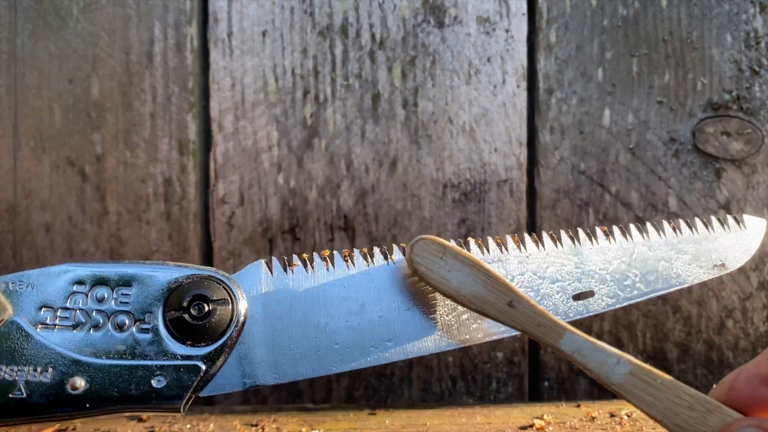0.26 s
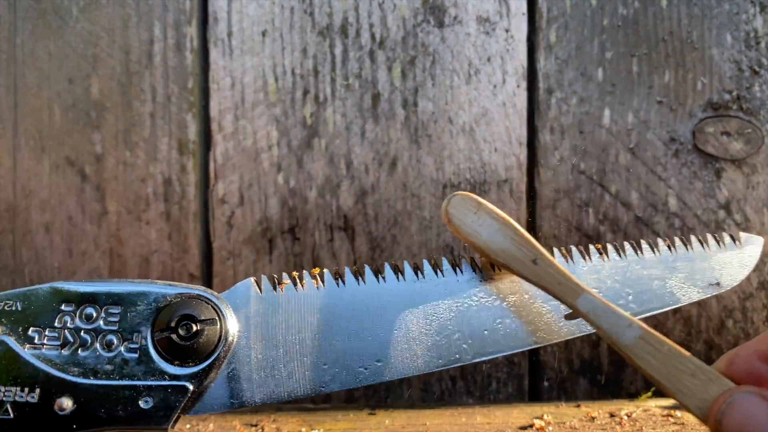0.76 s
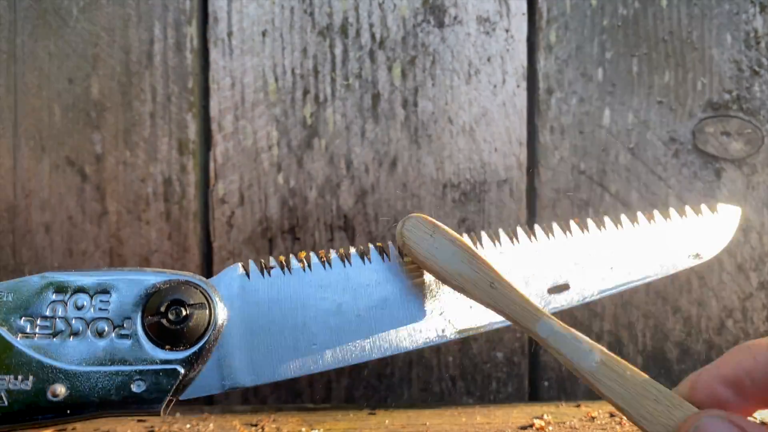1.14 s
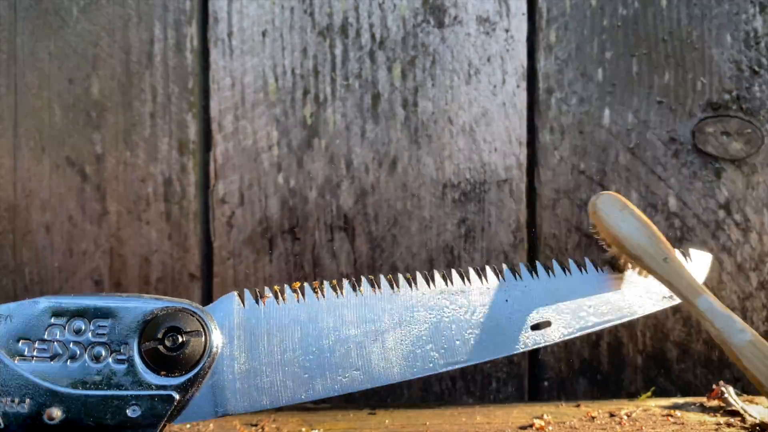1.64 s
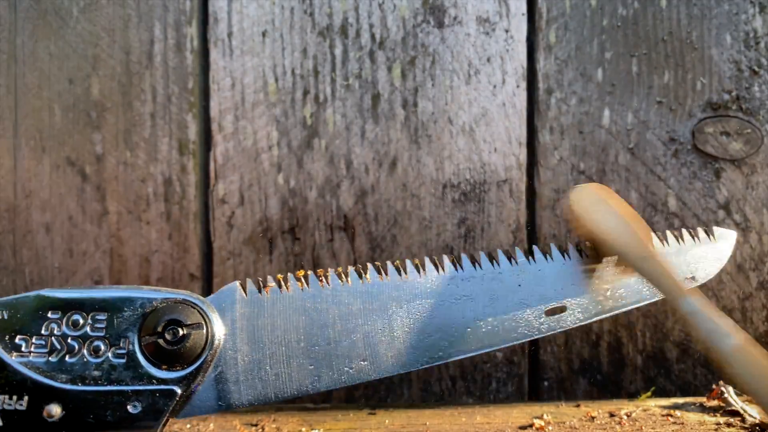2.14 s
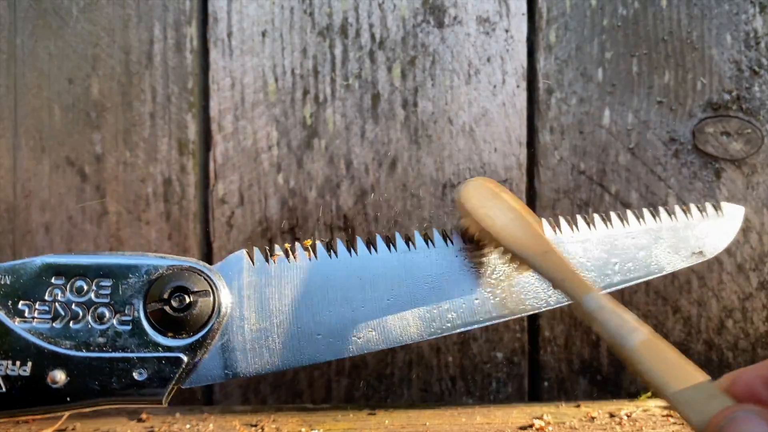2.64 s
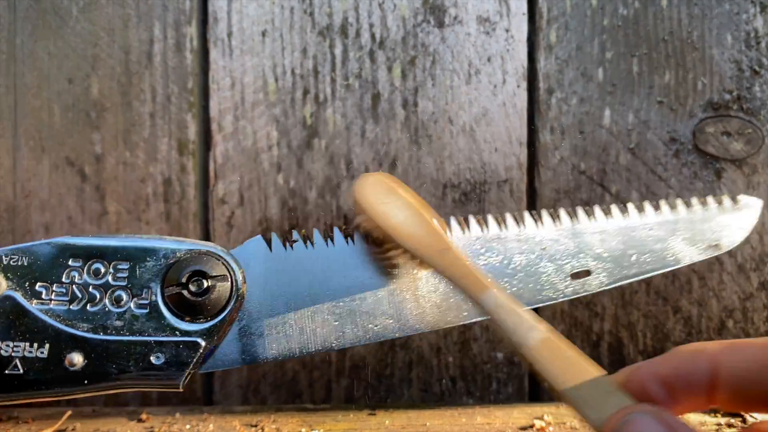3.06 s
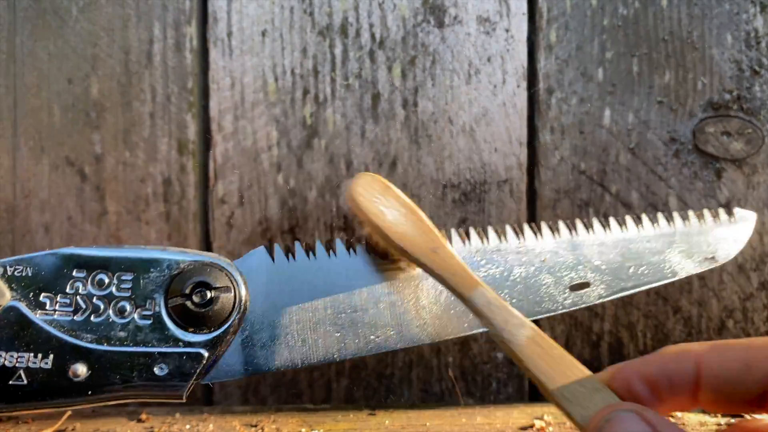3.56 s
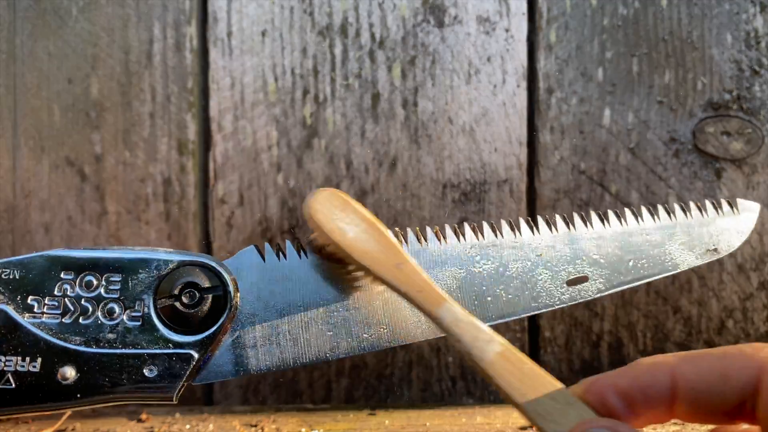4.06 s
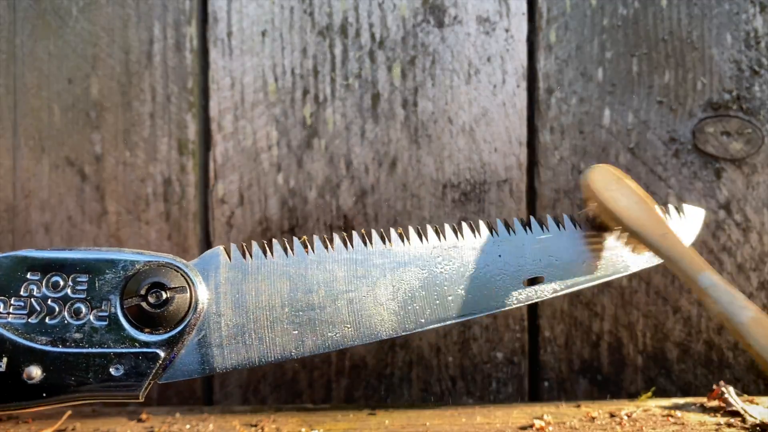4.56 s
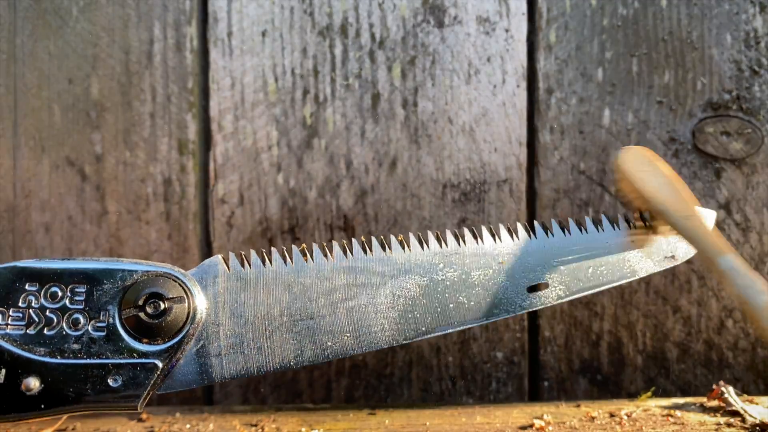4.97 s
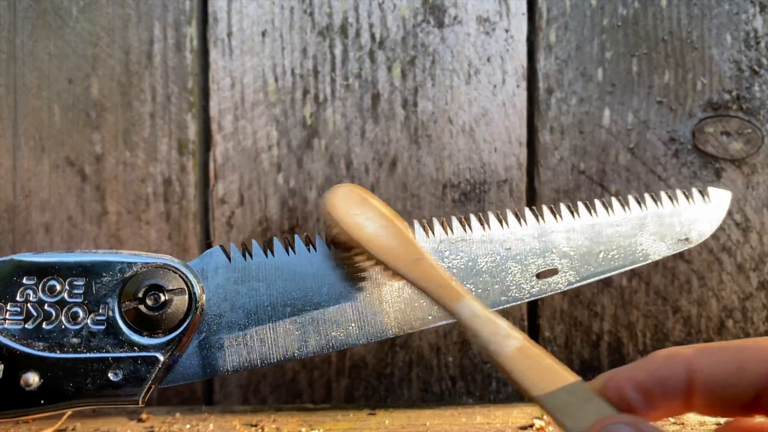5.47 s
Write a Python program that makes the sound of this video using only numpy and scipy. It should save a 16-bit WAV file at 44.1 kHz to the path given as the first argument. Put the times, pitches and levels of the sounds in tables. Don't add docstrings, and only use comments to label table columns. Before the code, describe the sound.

A bristle brush scrubs a saw's steel teeth in quick raspy strokes, the thin blade ringing brightly, over faint distant traffic.

```python
import sys
import numpy as np
from scipy import signal
from scipy.fft import rfft, irfft, next_fast_len
from scipy.io import wavfile
from scipy.ndimage import uniform_filter1d

SR = 44100
rng = np.random.default_rng(int(sys.argv[2]) if len(sys.argv) > 2 else 0)


def log_audio(samples):
    frames = np.atleast_2d(samples).T
    limited = np.clip(frames, -1, 1)
    pcm = np.round(limited * 32767).astype(np.int16)
    wavfile.write(sys.argv[1], SR, pcm)


def voltage_ratio(level):
    return 10 ** (np.asarray(level, float) / 20)


N = 252248

# (start [s], length [s], pressure at start [dB], pressure at end [dB])
STROKES = [(0.373, 0.018, -57, -56.5), (0.425, 0.12, -72, -51.5), (0.581, 0.011, -41.5, -78),
           (0.688, 0.039, -50, -41), (0.871, 0.11, -31, -52.0), (1.086, 0.041, -45.5, -49),
           (1.211, 0.072, -35.5, -45), (1.382, 0.021, -45.0, -48), (1.499, 0.1, -36.5, -41.5),
           (1.639, 0.023, -53, -69), (1.742, 0.049, -45, -40.5), (1.886, 0.11, -41.5, -44.5),
           (2.12, 0.26, -42.0, -46), (2.451, 0.021, -90, -57.5), (2.512, 0.17, -42.5, -42.0),
           (2.781, 0.15, -45, -45.5), (3.039, 0.075, -38.5, -41.5), (3.221, 0.15, -39, -50.5),
           (3.481, 0.126, -37, -44), (3.732, 0.091, -42, -42), (3.977, 0.29, -46, -46.0),
           (4.098, 0.45, -46, -48.5), (4.565, 0.073, -43, -44), (4.671, 0.025, -52, -67),
           (4.791, 0.026, -41, -56), (4.829, 0.02, -54.0, -46.5), (4.944, 0.11, -50.5, -41.5),
           (5.055, 0.31, -43.5, -55), (5.462, 0.25, -44, -39.5)]


def unit(x):
    return x / np.sqrt(np.mean(x ** 2) + 1e-20)


def curves(rows):
    s, *cols = np.transpose(rows)
    return [np.interp(np.arange(N) / SR, s, c) for c in cols]


def wobble(rate):
    knots = rng.standard_normal(4000)
    return 0.76 * np.interp(np.arange(N) * rate / SR, np.arange(len(knots)), knots)


def resonate(x, hz, width_hz):
    return signal.lfilter(*signal.iirpeak(min(hz, SR / 2.2), hz / width_hz, SR), x)


def noise(points):
    m = next_fast_len(N)
    hz, db = np.transpose(points)
    bins_hz = np.fft.rfftfreq(m, 1 / SR)
    gain = voltage_ratio(np.interp(np.log(bins_hz + 1), np.log(hz + 1), db, right=-120))
    return unit(irfft(rfft(rng.standard_normal(m)) * gain, m)[:N])


def swells(start, length, from_db, to_db, rise, fall, arch_db, trail_db, trail):
    t = np.arange(0, N / SR + .002, .001)
    u = np.clip((t - start) / np.maximum(length, 1e-3), 0, 1)
    arch = arch_db * np.sqrt(np.abs(length)) * (1 - (2 * u - 1) ** 2)
    db = from_db + (to_db - from_db) * u + arch
    after = np.maximum(t - start - length, 0)
    db = db - rise * np.maximum(start - t, 0)
    db = db + np.maximum(-fall * after, trail_db - trail * after)
    total_db = 10 * np.log10(np.sum(voltage_ratio(db) ** 2, axis=0) + 1e-16)
    return np.interp(np.arange(N) / SR, t, total_db)


def outdoors():
    # (time [s], level [dB])
    wash = [
        (0, -79.5),
        (.43, -73),
        (.62, -71),
        (2.3, -69),
        (4.2, -69),
        (5.56, -68),
        (5.72, -65),
    ]
    # (frequency [Hz], level [dB per Hz])
    air = [(30, -38), (60, -7.5), (100, -12), (250, -5.5), (400, -3.5), (1000, -2.5), (1600, -9),
           (2200, -20.5), (3000, -34), (15000, -46)]
    # (frequency [Hz], level [dB per Hz])
    engine_colour = [(35, -41), (55, -9), (85, -2), (118, 6), (150, -2.5), (220, -26)]
    # (time [s], peak level [dB])
    surges = [(.9, -81), (1.18, -74), (1.5, -72), (1.78, -67), (1.98, -75), (2.31, -63), (2.6, -75),
              (2.88, -75), (3.29, -73), (3.79, -73.5), (4.09, -68), (4.5, -78), (5.23, -76)]
    air_db, = curves(wash)
    s, db = np.transpose(surges)[..., None]
    surge_db = swells(s, 0 * s, db, db, rise=85, fall=61, arch_db=0, trail_db=-15, trail=30)
    idle_db = -83 + air_db - air_db.max()
    engine = (voltage_ratio(surge_db) + voltage_ratio(idle_db)) * voltage_ratio(1.6 * wobble(12)) * noise(engine_colour)
    return voltage_ratio(air_db + 1.5 + 2.0 * wobble(20)) * noise(air) + engine


def bird():
    # (time [s], pitch [Hz], level [dB], time to fade [s])
    chirps = [
        (.075, 4340, -96, 0.048),
        (.12, 4570, -86, 0.17),
        (0.165, 4620, -68, 0.065),
        (0.214, 4590, -67.5, 0.054),
        (0.249, 8080, -68, 0.032),
    ]
    out, t = np.zeros(N), np.arange(SR // 15) / SR
    for s, hz, db, t60 in chirps:
        phase = 2 * np.pi * hz * (t - 0.19 * t * t) + 1.0 * wobble(300)[:len(t)]
        onset = (1 - np.exp(-t / 0.0017)) ** 2
        out[round(s * SR):][:len(t)] += voltage_ratio(db + 11 - 40 * t / t60) * onset * np.sin(phase)
    return out


def knocks():
    # (time [s], flex peak level [dB], wood against flex [dB])
    bumps = [(0.8869, -50.5, -13), (1.2176, -41.5, -8.5), (1.2446, -46.5, -10.5), (1.517, -41, -13.5),
             (1.5479, -47.5, -8.5), (1.9809, -51.5, -24), (2.2209, -54, -4.5), (2.2694, -49, -8),
             (2.5975, -52, -13.5), (3.052, -56, -15), (4.1475, -47, -24), (4.2512, -53, -12),
             (5.1228, -51.5, -16), (5.5767, -47, -15), (5.685, -43.5, -13.5)]
    # (frequency [Hz], width [Hz], level [dB])
    head = [(352, 22, 2.5), (470, 690, -11.5), (1008, 12, 5), (1463, 42, 3)]
    flex, wood, t = np.zeros(N + SR), np.zeros(N + SR), np.arange(SR // 10) / SR
    for s, db, wood_db in bumps:
        push = voltage_ratio(db + 21.5 - 60 * t / 0.15) * rng.standard_normal(len(t))
        flex[round(s * SR):][:len(t)] += push
        wood[round(s * SR):][:len(t)] += voltage_ratio(wood_db - 4.0) * push
    out = resonate(flex[:N], 1985, 35) + voltage_ratio(-17) * resonate(flex[:N], 2064, 76)
    for hz, width_hz, db in head:
        out += voltage_ratio(db) * resonate(wood[:N], hz, width_hz)
    return out


def flicks(per_second, size_db, clump_db):
    chance, size = rng.random(N), np.minimum(rng.exponential(1, N), 3)
    clumps_db = clump_db * wobble(80) + 3.7 * wobble(330) + 0.47 * wobble(35)
    return unit((chance < per_second / SR) * voltage_ratio(size_db * size + clumps_db))


def tufts(rows):
    out, t = np.zeros(N + SR), np.arange(SR // 15) / SR
    for s, db, t60 in rows:
        t60 = np.clip(t60, .002, .08)
        onset = 1 - np.exp(-t / (0.14 * t60))
        out[round(s * SR):][:len(t)] += voltage_ratio(db - 6.5 - 60 * t / t60) * onset
    return out[:N]


def tuft_bursts():
    # (time [s], peak level [dB])
    catches = [(0.428, -34), (1.6397, -32), (0.4483, -16.5), (0.4748, -20), (0.5103, -31), (0.537, -25),
               (.675, -30.5), (.716, -40), (0.8498, -28), (0.866, -25), (0.925, -19.5), (1.1943, -44),
               (1.3785, -33), (1.489, -20.5), (1.8693, -40), (1.892, -32), (2.1057, -45), (2.1316, -26),
               (2.519, -43), (3.0401, -41), (3.2114, -57), (3.2284, -30), (3.729, -34), (4.407, -26),
               (4.44, -33), (4.4756, -30), (4.7687, -38), (4.783, -32), (4.958, -42), (5.481, -21.5)]
    # (time [s], peak level [dB], time to fade [s])
    strays = [(.3, -79, 0.0054), (.618, -46, .003), (.811, -45, .004), (1.044, -46, 0.0047),
              (1.505, -35, .0037), (1.6028, -45, .012), (1.725, -52, .004), (1.906, -14.5, 0.0034),
              (2.04, -54, .004), (4.71, -43, .004), (4.885, -56, .004), (1.96, -32, .0036),
              (2.453, -45, 0.0095), (2.7404, -38, 0.017), (3.175, -55, 0.016), (3.447, -44, 0.017),
              (3.6943, -32.5, .012), (4.348, -24, .0096), (4.665, -24.5, 0.0077), (4.686, -52, 0.014),
              (4.809, -38, .0034)]
    first = [(s - 0.0072, db - 0.5) for s, _, db, _ in STROKES]
    return tufts([(s, db, 0.01) for s, db in catches + first] + strays)


def plucks():
    # (time [s], peak level [dB])
    slips = [
        (.478, -29),
        (1.657, -15),
        (1.959, -12.5),
        (3.547, -16),
        (4.635, -33),
        (4.687, -19),
        (4.836, -15.5),
    ]
    return 11 * tufts([(s, db, .009) for s, db in slips])


def brush_pressure():
    # (start [s], length [s], pressure at start [dB], pressure at end [dB])
    lingers = [(0.318, 0.059, -94.5, -67), (0.421, 0.018, -56, -45), (.76, 0.061, -75, -78),
               (1.308, 0.039, -81, -84), (1.438, .05, -71, -74), (2.732, .05, -79, -76),
               (3.144, 0.078, -81, -74), (3.643, 0.05, -82, -73), (4.694, 0.028, -76, -73),
               (4.894, 0.044, -71, -63), (5.357, 0.028, -65, -71)]
    start, length, from_db, to_db = np.transpose(STROKES + lingers)[..., None]
    return swells(start, length, from_db, to_db, rise=1190, fall=1031,
                  arch_db=8.5, trail_db=-29, trail=405)


def ring_balance(pressure_db):
    # (time [s], seat [0 = on the tooth tips, 1 = on the flat])
    seat_path = [(.3, -0.77), (.52, 0.81), (.95, 0.69), (1.22, -0.11), (1.4, 1), (1.52, 0.31), (1.75, 0.76),
                 (1.98, 0.25), (2.15, 0.74), (2.31, -0.047), (4.27, 0.028), (4.4, 0.63), (4.54, 0.49),
                 (4.72, -0.11), (5.08, 0.64), (5.26, -0.2), (5.55, 0.13), (5.72, 0.63)]
    # (time [s], reach [0 = where the middle rings are at rest, 1 = where they swing most])
    reach_path = [(.4, 0.91), (.6, 0.2), (.75, 0.42), (1.0, 0.32), (1.22, 1), (1.42, 1), (1.65, 0.025),
                  (2.02, 0.18), (2.28, 0.6), (2.5, 0.57), (3.0, 0.35), (3.5, 0.28), (4.12, 0.19),
                  (4.33, 0.78), (4.58, 0.18), (5.17, 0.79), (5.42, 0), (5.72, 0.86)]
    (seat,), (reach,) = curves(seat_path), curves(reach_path)
    eased_db = np.clip(-42.5 - pressure_db, 0, 40)

    def family_db(tips_db, flat_db, belly_db, lag):
        return tips_db + flat_db * seat + belly_db * reach + lag * eased_db

    teeth = family_db(-2.28, -17, -0.6, 0.4)
    second = family_db(-13.5, -4.5, 9.5, .2)
    mid = family_db(-10.5, 3, 8.5, 0.1533)
    bending = 0.27 * teeth + 0.27 * second + 0.63 * mid - 13
    return bending, teeth, second, mid, 0


def saw():
    # (frequency [Hz], width [Hz], level [dB])
    blade = [(1440, 39, -22), (1990, 44, -15), (2810, 70, -22), (3170, 40, -18), (4160, 33, -3),
             (4370, 45, 0), (5330, 53, -4), (5840, 50, -15), (6310, 76, -9), (6810, 36, -9), (7200, 56, -3),
             (7840, 40, -11), (8190, 81, -12), (8510, 67, -15), (8950, 38, -12), (9190, 79, -12),
             (10200, 96, -8), (10600, 32, -14), (11400, 68, -4), (12300, 98, -5), (13400, 74, -8),
             (13900, 70, -9), (15100, 100, -5), (15400, 43, -9),
             (2230, 50, -22), (3800, 60, -18), (4580, 50, -13), (5250, 40, -10), (10080, 45, -8),
             (11300, 60, -6), (12500, 80, -5), (15010, 70, -8), (14150, 70, -9), (14600, 70, -14)]
    # (frequency [Hz], width [Hz], level [dB])
    bristle = [(2020, 920, -35.5), (3050, 280, -21.5), (4000, 275, -17), (4820, 570, -25), (5240, 300, -19),
               (7400, 1100, -33), (9100, 1400, -34), (10440, 700, -20), (13100, 830, -12.5),
               (15700, 3400, -16.5)]
    # (frequency [Hz], ..)
    plucked_hz = (4160, 4370)
    # (frequency [Hz], ..)
    family_hz = (3400, 4900, 5700, 9600)
    pressure_db = brush_pressure()
    balance_db = ring_balance(pressure_db)
    rasp = flicks(per_second=12000, size_db=2.0, clump_db=-0.5)
    burst, pluck = tuft_bursts(), plucks()
    resting = voltage_ratio(-87.5) * np.clip((np.arange(N) / SR - 0.28) / 0.068, 0, 1)
    modes = np.array(blade + bristle) * [1, .8, 1]
    family = np.searchsorted(family_hz, modes[:, 0])
    bursts_db = (-25.0, -6.5, -5, 1.5, 5.5)
    rests_db = (6.5, -1, -3.5, 1.5, -2.0)
    out = np.zeros(N)
    for k, (rel_db, burst_db, rest_db) in enumerate(zip(balance_db, bursts_db, rests_db)):
        rubbing = voltage_ratio(pressure_db + rel_db) + voltage_ratio(rest_db) * resting
        force = rubbing * rasp * voltage_ratio(1.3 * wobble(45)) + voltage_ratio(burst_db) * burst
        own = modes[family == k]
        coupling = np.array([voltage_ratio(db + 8.15 * wobble(8.8)) for db in own[:, 2]])
        force /= np.sqrt(own[:, 1] @ coupling ** 2 * np.pi / SR)
        for (hz, width_hz, db), gain in zip(own, coupling):
            spots = rng.standard_normal(N)
            drive = gain * force + (hz in plucked_hz) * voltage_ratio(db) * pluck
            out += resonate(drive * spots, hz, width_hz)
    return out


def damped(x, patchy_db):
    z = signal.stft(x, nperseg=512, noverlap=384)[2]
    field = uniform_filter1d(rng.standard_normal(z.shape), size=3, axis=0)
    field = uniform_filter1d(field, size=6, axis=1)
    return signal.istft(z * voltage_ratio(patchy_db * unit(field) - 1.5), nperseg=512, noverlap=384)[1][:N]


def scene():
    return (damped(saw(), patchy_db=3) + knocks() + bird() + outdoors())[None]


def roll_off(x):
    return signal.sosfilt(signal.butter(12, 16480, fs=SR, output="sos"), x)


def record(dry):
    band_limit = signal.ellip(14, .5, 90, 15750, fs=SR, output="sos")
    return roll_off(signal.sosfilt(band_limit, dry))


dry = scene()
out = record(dry)
log_audio(out)
```